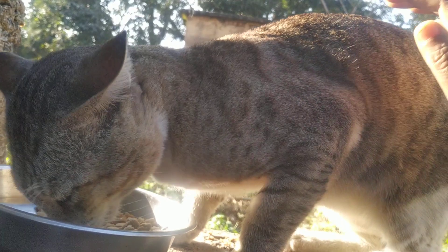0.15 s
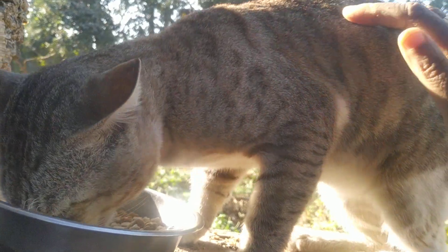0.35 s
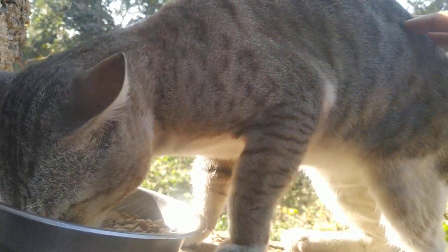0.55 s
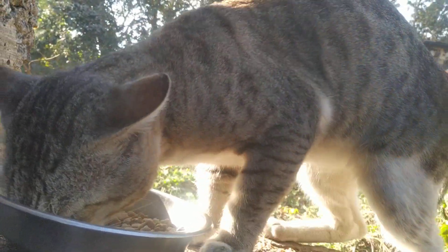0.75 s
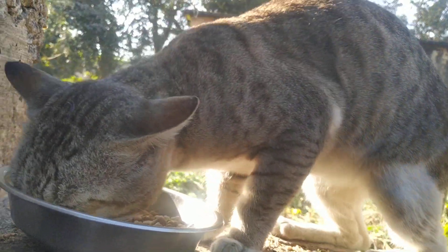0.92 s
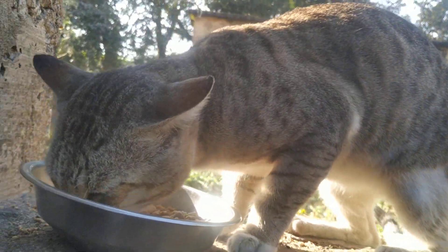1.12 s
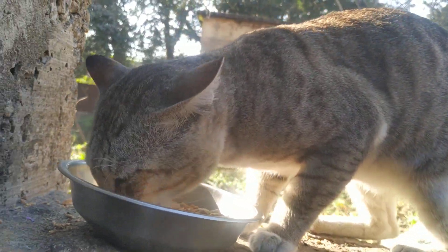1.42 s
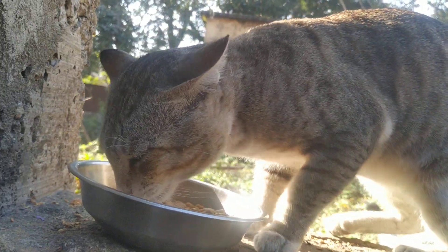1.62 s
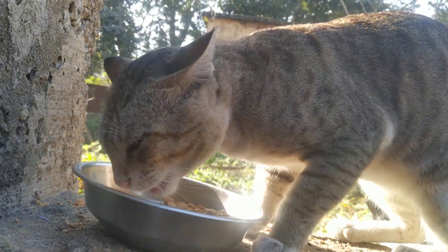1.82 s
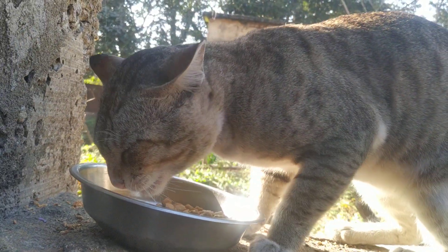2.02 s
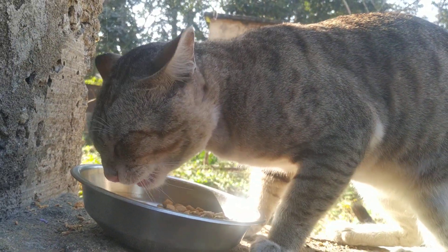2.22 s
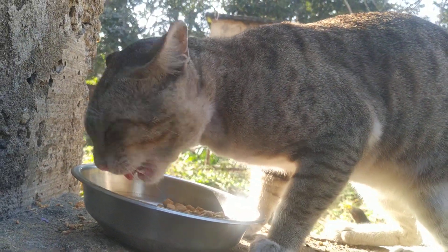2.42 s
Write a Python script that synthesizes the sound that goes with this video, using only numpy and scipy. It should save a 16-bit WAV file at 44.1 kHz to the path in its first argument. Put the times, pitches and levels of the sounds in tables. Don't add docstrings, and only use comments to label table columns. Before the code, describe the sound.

Two loud rough crow caws come first, with sharp pellet cracks and small bowl knocks from a cat eating beside the microphone; later faint distant caws, more crunching and a thin insect trill outdoors.

```python
import sys
import numpy as np
from scipy import signal
from scipy.fft import rfft, irfft
from scipy.io import wavfile
from scipy.ndimage import uniform_filter1d

SR = 44100
rng = np.random.default_rng(int(sys.argv[2]) if len(sys.argv) > 2 else 0)


def master(y):
    cut = np.clip(np.atleast_2d(y).T, -1, 1)
    pcm = np.round(cut * 32767)
    wavfile.write(sys.argv[1], SR, pcm.astype(np.int16))


def field_ratio(decibels):
    return 10 ** (np.asarray(decibels, dtype=float) / 20)


N = 112454


def evened(x):
    return x / np.sqrt(np.mean(x ** 2) + 1e-20)


def read(points, hz):
    f, value = np.transpose(points)
    return np.interp(np.log(hz + 1), np.log(f + 1), value)


def add(mix, s, sound):
    at = round(s * SR)
    sound = sound[..., max(-at, 0):]
    part = mix[..., max(at, 0):][..., :sound.shape[-1]]
    part += sound[..., :part.shape[-1]]


def resonate(x, hz, width_hz):
    turn = np.exp(2j * np.pi * np.cumsum(hz * np.ones(len(x))) / SR)
    r = np.exp(-np.pi * width_hz / SR)
    slow = signal.lfilter([(1 - r) ** 2], [1, -2 * r, r * r], x / turn + 1e-18)
    return 2 * (turn * slow).real


def drift(count, size):
    once = uniform_filter1d(rng.standard_normal(count), size)
    return evened(uniform_filter1d(once, size))


# f/Hz, level/dB
PORT_LEVEL = [(60, 0), (110, 2.5), (200, -1), (380, 6), (700, 1.5), (1290, 0.5), (2380, -2), (4400, 1),
              (8120, -9.5), (15000, 3)]
# f/Hz, phase/rad
PORT_PHASE = [(0, -1), (1030, 0.84), (2150, 2), (3790, 4.5), (9300, 10), (10500, 14), (14400, 8.5),
              (16300, 15)]


def ports(x):
    hz = np.fft.rfftfreq(N, 1 / SR)
    half = field_ratio(read(PORT_LEVEL, hz) / 2) * np.exp(.5j * read(PORT_PHASE, hz))
    return irfft(rfft(x) * np.array([half, 1 / half]), N)


# f/Hz, density/(dB per Hz)
TRAFFIC = [(12, -12.5), (25, -4), (50, 1.5), (90, -6), (180, -12), (400, -24), (800, -33.5), (1500, -53)]
# f/Hz, density/(dB per Hz)
LEAVES = [(200, -30), (600, -26.5), (1300, -23.5), (2100, -26.5), (4000, -32), (6900, -36.5), (11000, -47),
          (16000, -45.5)]


def air():
    air_db = -44.5
    frames, hz = N // 512 + 5, np.fft.rfftfreq(2048, 1 / SR)
    bed = 0
    for colour, same in ((TRAFFIC, .98), (LEAVES, .033)):
        a, b, c, d, patches = rng.standard_normal((frames, 1025, 5)).T
        patches = uniform_filter1d(patches, size=20, axis=0)
        patches = evened(uniform_filter1d(patches, size=7, axis=1))
        left = a + 1j * b
        right = same * left + np.sqrt(1 - same ** 2) * (c + 1j * d)
        bed = bed + np.array([left, right]) * field_ratio(read(colour, hz)[:, None] + 0.82 * patches)
    noise = signal.istft(bed, nperseg=2048, noverlap=1536)[1][:, :N]
    return field_ratio(air_db) * evened(ports(noise))


# t/s, length/s, level/dB, top f/Hz, sag share
FAR_CAWS = [
    (-.1, 0.34, -59.5, 648, .27),
    (0.739, 0.19, -57, 659, 0.086),
    (0.867, 0.11, -58, 658, 0.27),
    (1.487, 0.35, -48.5, 699.6, .27),
    (1.621, 0.14, -56, 617, 0.065),
    (1.567, 0.11, -52.5, 492.2, 0.013),
    (1.79, 0.058, -49.5, 606, 0.057),
]
# f/Hz, width/Hz, level/dB
FAR_FORMANTS = [(1300, 300, 0), (1480, 60, 2), (1950, 500, -3), (2420, 160, -3)]


def far_caw(start, length, level_db, top_hz, sag):
    dull, breath, wander_db, swell = .8, .36, 3.5, .8
    u = np.arange(0, 1, 1 / (SR * length))
    hz = top_hz * (1 - sag * abs(u - .3) ** 1.25) * (1 + .003 * drift(len(u), size=200))
    turns = 2 * np.pi * np.cumsum(hz) / SR
    folds = sum(field_ratio(wander_db * drift(len(u), size=900)) * np.cos(k * turns) for k in range(1, 6))
    drive = (1 - breath) * evened(folds) + breath * 3 * rng.standard_normal(len(u))
    voice = 0
    for f, width_hz, db in FAR_FORMANTS:
        dull_db = dull * (level_db + 48) * (f > 1400)
        voice = voice + field_ratio(db + dull_db) * resonate(drive, f, width_hz)
    return start, field_ratio(level_db) * np.sin(np.pi * u) ** swell * evened(voice)


def yard(x):
    t60_s = .3
    t = np.arange(SR // 2) / SR
    tail = rng.standard_normal((2, len(t))) * field_ratio(-60 * t / t60_s) * (t > .006)
    tail = signal.lfilter([.5], [1, -.5], tail)
    return signal.fftconvolve(x[None], tail / np.linalg.norm(tail[0]), axes=1)[:, :N]


# t/s, peak level/dB, ring f/Hz, left-right level/dB, snap f/Hz
CRACKS = [(0.013, -54, 6300, 0, 6900), (1.845, -43, 3860, 0, 4000), (.866, -32, 4750, -13, 7600),
          (1.005, -36.5, 2430, -18, 2520), (1.022, -22, 3450, -13, 3150), (1.812, -49, 10800, 3, 12000),
          (1.8823, -41.5, 9400, 16, 10000), (1.9128, -49, 8700, 17, 10000),
          (1.9618, -26.5, 5700, -9.5, 4340), (1.977, -22.5, 5000, 4.5, 10400), (2.091, -44, 4050, 10, 4000),
          (2.111, -48, 2490, 9, 3940), (2.2549, -34.5, 5860, 5, 9300), (2.2882, -33, 4100, -16, 9200)]


def bite(s, peak_db, ring_hz, pan_db, snap_hz):
    t60_s, spread_s, snap_db, ring_db = 0.0097, 0.0015, -1, -7.5
    t = np.arange(1300) / SR
    noise = rng.standard_normal(2 * len(t))
    snap = resonate(noise, snap_hz, snap_hz ** 2 / 5360).reshape(2, -1)
    snap = snap * (8000 / snap_hz) * field_ratio(-90 * t / t60_s)
    ring = field_ratio(-60 * t / t60_s) * np.sin(2 * np.pi * ring_hz * t)
    one = field_ratio(snap_db) * (snap[0] + .5 * snap) + field_ratio(ring_db) * ring
    one = signal.lfilter(*signal.butter(2, snap_hz / 3.6, "high", fs=SR), one)
    out = one.copy()
    for lag, size in rng.random((3, 2)):
        add(out, (1 + 2 * lag) * spread_s, 0.47 * size * one)
    return s, field_ratio(peak_db) * field_ratio([[pan_db / 2], [-pan_db / 2]]) * out


# t/s, level/dB, f/Hz
BOWL_KNOCKS = [
    (.035, -44.5, 1100),
    (0.867, -39, 1820),
    (1.79, -39, 1040),
    (1.891, -41, 1200),
    (1.961, -36.5, 1070),
    (2.2549, -41, 970),
    (2.287, -43.5, 1370),
]


def knock(s, db, hz):
    t60_s = 0.014
    t = np.arange(1000) / SR
    return s, field_ratio(db - 60 * t / t60_s) * np.sin(2 * np.pi * hz * t)


# t/s, sum tone f/Hz, effort level/dB, membrane difference f/Hz
FIRST_CAW = [
    (.172, 597.7, -63, 82.4),
    (.205, 674.3, -37, 81.1),
    (.24, 804, -29.5, 82.6),
    (.295, 972, -25.5, 82.14),
    (.418, 1032, -24.5, 82.6),
    (.47, 1018, -27.5, 79),
    (.512, 977.6, -30, 70.3),
    (.535, 747, -35.5, 70.9),
    (.575, 480, -67, 72),
]
SECOND_CAW = [
    (.975, 601, -53, 82.8),
    (1.02, 698.4, -33, 83.83),
    (1.075, 987.5, -26, 82.94),
    (1.14, 1006, -25, 82.46),
    (1.19, 1022, -26, 83.8),
    (1.245, 1008, -27, 82.6),
    (1.305, 987.4, -29, 79),
    (1.335, 717.5, -38.5, 79),
    (1.375, 486, -50, 76),
]
MIXING_TONES = [
    [[(-39, -20.5, -16.5, -15.5, 0, -15), (-11, -13, -3.5, -16, 1.5, -4.5),
     (-2.5, -25, -20, -12, -13, -5.5), (0, -21, -26, -18, -33, -9)], [(-50, -24, -10, -31, -1.5, -8),
     (-29, -3, 2.5, -34, 1, 2.5), (-6, -3, -25, -4, -7, -3.5), (-20, -17, -30, -30, -31, -12)]],
    [[(-38, -19, -10.5, -20, -1.5, -13), (-26, -23, -11, -13, 3, -1.5), (-1.5, -2, -3, -9, -3, -3),
     (-18, -8, -26, -22, -30, -12)], [(-42, -21.5, -11, -20, 1.5, -13), (-23, -15, -1.5, -19, 1, -10),
     (-8, 1.5, 1, -7, -3, -5), (-5, -12, -30, -23, -38, -40)]],
]
# f/Hz, width/Hz, level/dB
FORMANTS = [(1011, 114, -9.5), (1270, 210, -7.5), (1548, 140, -4.5), (1754, 94, -2.5), (2000, 220, -16),
            (3800, 74, -19)]
# f/Hz, density/(dB per Hz)
RASP_COLOUR = [(2300, 4.5), (3050, -7.5), (3550, 1.5), (4200, -10.5), (5300, -3), (11200, -9), (12500, -26),
               (15000, -19)]


def caw(curve, tone_mixes, settle_s):
    lock_hz, lock_width_hz, wander_db, jitter = 925, 38, 1.3, .0012
    rough_db, rough_ends_db, glide_db, glide_width_hz, drop_db = -10, -1, -12, 130, -6.5
    rasp_db, rasp_follow, rasp_lead_s, puff_depth = -10.5, 1.03, 0.0074, 0.16
    s, sum_hz, db, apart_hz = np.transpose(curve)
    t = np.arange(s[0], s[-1], 1 / SR)
    n = len(t)
    top = uniform_filter1d(np.interp(t, s, sum_hz), size=600)
    effort_db = np.interp(t, s, db)
    beat_hz = np.interp(t, s, apart_hz) * (1 + 2 * jitter * drift(n, size=500))
    low_hz = (top * (1 + jitter * drift(n, size=200)) - beat_hz) / 2
    beat = 2 * np.pi * np.cumsum(beat_hz) / SR
    low = 2 * np.pi * np.cumsum(low_hz) / SR
    lock = 1 / (1 + np.exp((lock_hz - top) / lock_width_hz))

    late = np.clip((t - settle_s) / .03 + .5, 0, 1)
    tones = 0
    for m, row in enumerate(np.transpose(tone_mixes, (1, 2, 0))):
        for k, (early_mix, late_mix) in enumerate(row):
            tone_db = early_mix + (late_mix - early_mix) * late
            tone_db = tone_db + wander_db * (m + .5) / 2 * drift(n, size=1500)
            phase = (m + 2) * low + (k - len(row) // 2) * beat + 3 * rng.random()
            tones = tones + field_ratio(tone_db) * np.cos(phase)

    gate = (1 + puff_depth * np.cos(low)) * (1 + puff_depth * np.cos(beat))
    puffs = gate * rng.standard_normal(n)
    rough = evened(sum(field_ratio(d) * resonate(puffs, f, w) for f, w, d in FORMANTS))
    glide = evened(resonate(puffs, top, glide_width_hz))
    locked = evened(tones) + field_ratio(rough_db) * rough
    loose = field_ratio(rough_ends_db) * rough + field_ratio(glide_db) * glide
    loose = loose + (t > t.mean()) * field_ratio(drop_db) * (np.cos(2 * low + beat) + .2 * glide)
    voice = lock * locked + (1 - lock) * loose

    hz = np.fft.rfftfreq(n, 1 / SR)
    rasp = evened(irfft(rfft(puffs) * (hz > 2200) * field_ratio(read(RASP_COLOUR, hz)), n))
    early_db = np.minimum(np.interp(t + rasp_lead_s, s, db), effort_db + 0.5)
    rasp_level_db = db.max() + rasp_db + rasp_follow * (early_db - db.max())
    fade = np.clip(np.minimum(t - s[0], s[-1] - t) / 0.0049, 0, 1)
    return s[0], fade * (field_ratio(effort_db) * voice + field_ratio(rasp_level_db) * rasp)


def near(x):
    near_db, t60_s = -5, .02
    t = np.arange(800) / SR
    tail = np.diff(rng.standard_normal((2, len(t) + 2)), 2) * field_ratio(-60 * t / t60_s)
    return field_ratio(near_db) * signal.fftconvolve(x[None], tail / np.linalg.norm(tail[0]), axes=1)[:, :N]


def chew():
    mid_s, length_s, level_db = 1.85, 0.076, -53
    crumbs = resonate(rng.standard_normal(2 * N), 10000, 7000).reshape(2, N)
    crumbs = crumbs * field_ratio(2.5 * drift(N, size=60))
    return field_ratio(level_db) * np.exp(-((np.arange(N) / SR - mid_s) / length_s) ** 2) * crumbs


# t/s, f/Hz, level/dB
INSECT_TRILL = [
    (2.167, 6860, -73),
    (2.2, 6830, -60),
    (2.223, 6710, -50),
    (2.359, 6690, -59.5),
    (2.43, 6720, -58),
    (2.52, 6750, -80),
]


def insect():
    width_hz, octave_db = 95, -21
    s, hz, db = np.transpose(INSECT_TRILL)
    t, out = np.arange(s[0], s[-1], 1 / SR), np.zeros(N)
    buzz = evened(resonate(rng.standard_normal(len(t)), np.interp(t, s, hz), width_hz))
    octave = buzz ** 2 - uniform_filter1d(buzz ** 2, size=64)
    add(out, s[0], field_ratio(np.interp(t, s, db)) * (buzz + field_ratio(octave_db) * octave))
    return out * field_ratio([[-1], [1]])


def scene():
    yard_db = -13
    far, cat, crow = np.zeros(N), np.zeros((2, N)), np.zeros(N)
    for row in FAR_CAWS:
        add(far, *far_caw(*row))
    for row in CRACKS:
        add(cat, *bite(*row))
    for row in BOWL_KNOCKS:
        add(cat, *knock(*row))
    add(crow, *caw(FIRST_CAW, MIXING_TONES[0], settle_s=0.407))
    add(crow, *caw(SECOND_CAW, MIXING_TONES[1], settle_s=1.165))
    far_crow = 0.6 * far + .5 * yard(far)
    near_crow = ports(crow) + near(crow) + field_ratio(yard_db) * yard(crow)
    return air() + far_crow + cat + near_crow + chew() + insect()


def top_cut(x):
    return signal.sosfilt(signal.butter(12, 16670, fs=SR, output="sos"), x)


def record(dry):
    low_pass = signal.firwin(511, 16000, window=("kaiser", 9), fs=SR)
    mix = signal.oaconvolve(dry, low_pass[None], "same")
    return top_cut(mix)


dry = scene()
out = record(dry)
master(out)
```